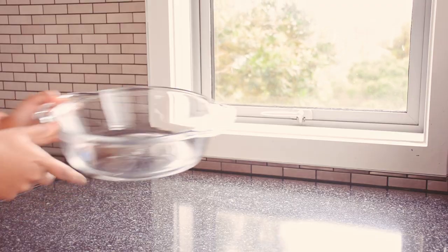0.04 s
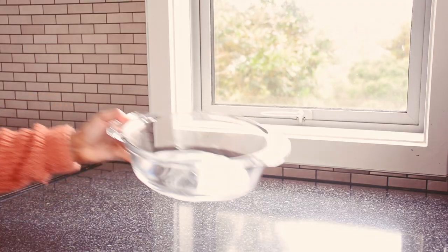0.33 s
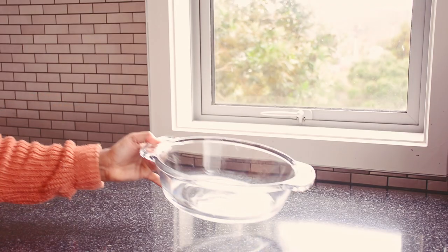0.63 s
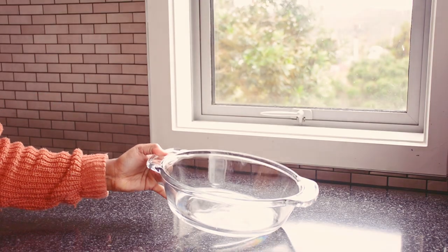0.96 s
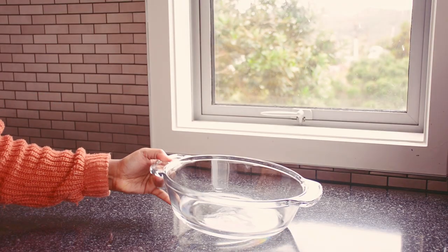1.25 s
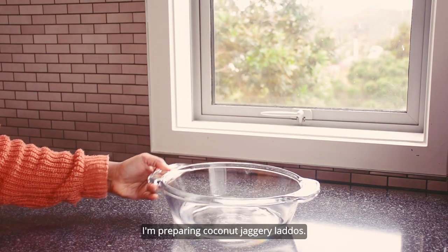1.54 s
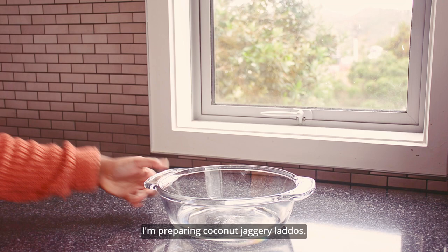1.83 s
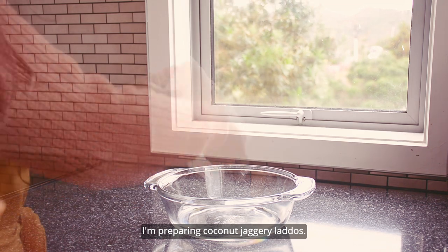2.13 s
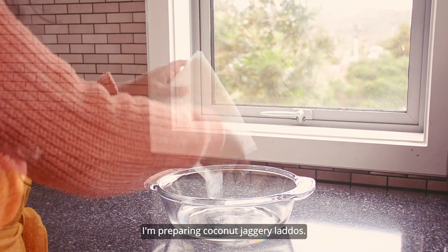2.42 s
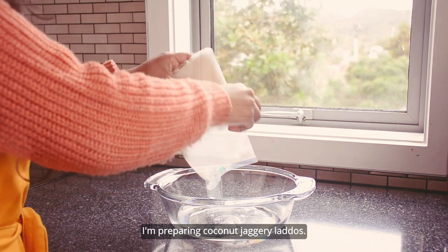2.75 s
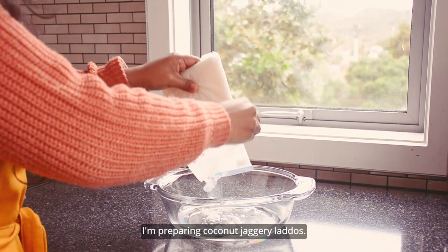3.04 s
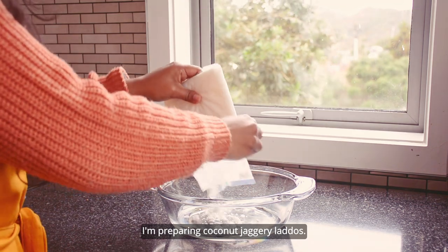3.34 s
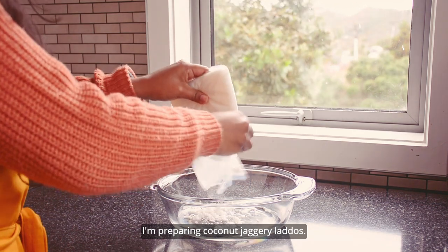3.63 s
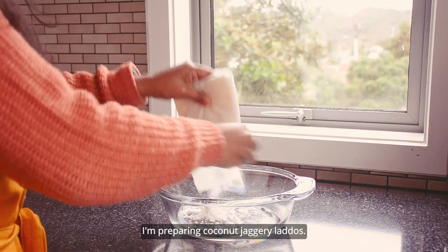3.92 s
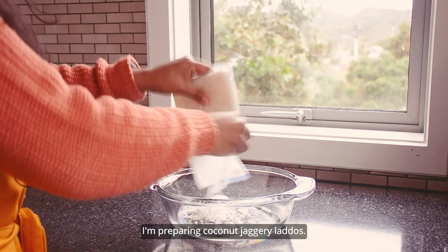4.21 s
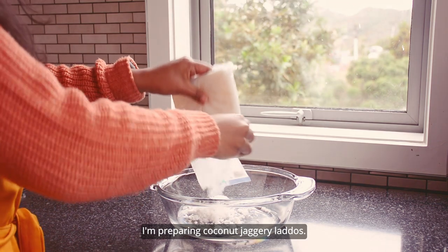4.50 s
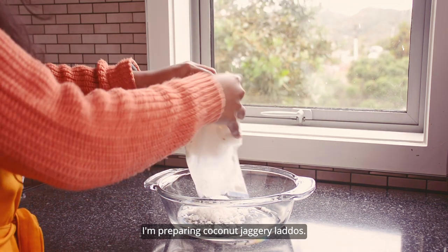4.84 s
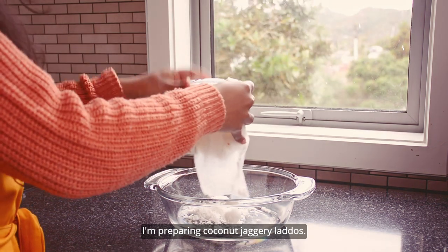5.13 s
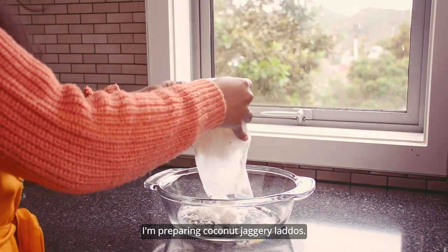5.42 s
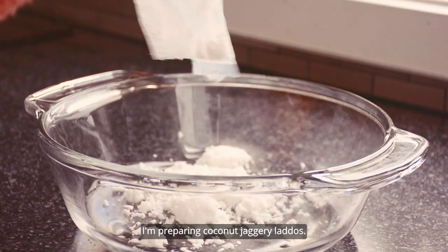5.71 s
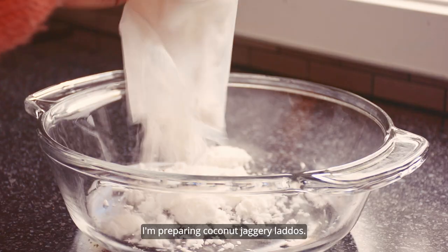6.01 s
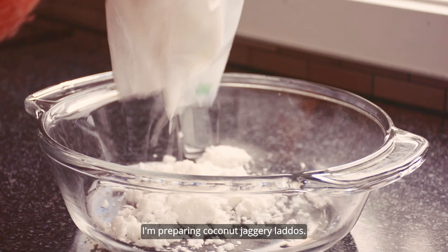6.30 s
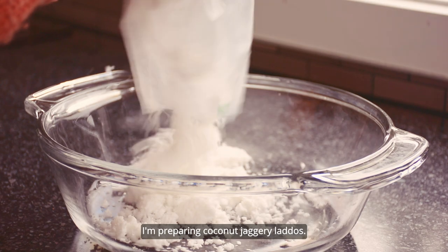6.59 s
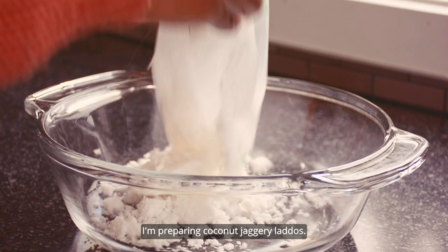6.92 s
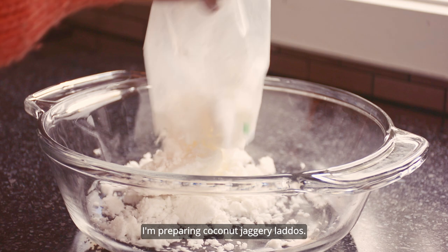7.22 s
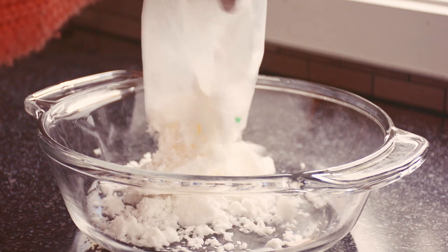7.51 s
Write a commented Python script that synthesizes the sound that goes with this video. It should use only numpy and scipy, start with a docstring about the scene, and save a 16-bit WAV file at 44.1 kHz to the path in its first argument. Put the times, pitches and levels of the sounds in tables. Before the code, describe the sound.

A double knock is followed by the hard thud of a glass bowl on a stone kitchen counter. The bowl settles with several quick knocks and a fading ring. Then come two quieter spells of plastic crinkling, with a lull between, as a bag is shaken and squeezed empty and coconut flakes patter softly into the glass. The small, still room echoes briefly, and the loudest blows just overload the microphone.

```python
"""Grated coconut into a glass bowl

In a tiled kitchen something knocks, then a glass bowl lands on a stone counter, rocks flat and rings.
A thin plastic bag of grated coconut is shaken and squeezed over it: the film buckles in sharp crinkles,
the flakes rustle down into the bowl, and the room echoes the knocks, crinkles and rustle."""
import sys
import numpy as np
from scipy import signal
from scipy.fft import rfft, irfft
from scipy.io import wavfile
from scipy.ndimage import uniform_filter1d

SR = 44100
rng = np.random.default_rng(int(sys.argv[2]) if len(sys.argv) > 2 else 0)


def to_wav(s):
    """Save 16-bit WAV."""
    ch = np.atleast_2d(s).T  # columns
    pcm = np.round(np.clip(ch, -1, 1) * 32767)  # PCM
    wavfile.write(sys.argv[1], SR, pcm.astype(np.int16))


N = 332955
TIME = np.arange(N) / SR

# Levels in dB are relative. A ring time is how long a sound takes to fade by 60 dB.
# Tone colours. Each row: frequency in Hz, level in dB.
AIR_COLOUR = [(15, -43), (25, -17.5), (114, -4.5), (137, -7.5), (157, -18), (200, -10), (531, -19.5),
              (659, -17), (796, -22), (16000, -32)]  # the quiet room
THUD_COLOUR = [(35, -47), (100, -19.5), (170, -19), (255, -5), (450, 0), (850, -1.5), (1100, -6),
               (1900, -12), (3000, -22), (5500, -35), (9000, -41), (16000, -57)]  # a blow on the counter
FILM_COLOUR = [(400, -20), (950, -2.5), (1400, 2), (2700, 3.5), (5000, -3.5), (7000, -34.5), (12000, -44.5)]  # ringing plastic
SNAP_COLOUR = [(2000, -44.5), (5200, 5.5), (8000, 7.5), (10000, 1), (13000, -2.5), (16000, -10)]  # snapping plastic
BAG_COLOUR = [(40, -24), (110, -9.5), (160, -8), (280, -3), (500, 1.5), (800, 3), (1300, -7.5),
              (5000, -78.5)]  # a jolt of the whole bag
FLAKE_COLOUR = [(50, -30), (110, -3), (180, -4), (310, 6), (550, 6), (950, 3.5), (1400, 2.5), (2400, -3),
                (4500, -9.5), (8000, -22), (16000, -40.5)]  # falling coconut
# Blows on the counter. Each row: start in seconds, level in dB, brightness in dB per octave,
# the counter's share of hollow ringing in dB, level of the glass ping in dB.
BLOWS = [(0.1251, -30.5, 1.5, 3, -90), (0.195, -29.5, 5, 8, -90), (0.217, -7.5, -1.6, -22, -90),
         (.232, -11.5, 4, -24, -87), (0.787, -50, 6, -13, -60.5), (1.0274, 0, -2, 1, -53),
         (1.04, -2.5, -8.5, 4, -35.5), (1.469, -34.5, -17, -12, -90), (1.545, -32, -3.5, 7.5, -81),
         (1.5922, -20.5, -3, 6, -71), (1.6522, -14, 0, 12.5, -66), (1.675, -6, -3.5, 9, -40),
         (1.6964, 3, -4.5, -23, -40.5), (1.714, -10.5, -3, 9.5, -52)]
# Tones that struck things ring with. Each row: pitch in Hz, level in dB, ring time in seconds.
COUNTER_TONES = [(251.2, 12.5, 0.12), (282.2, 3, 0.26), (384.6, -3.5, 0.3), (474, -8, 0.26),
                 (538, -15, 0.77), (565, -16, 0.45), (597, 9, 0.31), (832, 6, 0.16), (840, -6, 0.124),
                 (1108, -18, 0.42), (1285, -4.5, 0.2)]
GLASS_TONES = [(690, 11, 0.48), (1660, 7, 0.24), (2300, -11, .2), (3857, -0.5, 0.36), (4030, -6, 0.64),
               (4500, -11, 0.31), (5710, -7, .4), (5670, -1, 0.28)]
# Cabinet shudders, and the own tone of the first knocked thing. Each row: start in seconds, pitch in Hz, level
# in dB, ring time in seconds.
SHUDDERS = [(.218, 43.6, -35, 0.86), (0.219, 413, -8.5, 0.14), (1.027, 101, -41.5, .35),
            (1.68, 52.6, -33, .3)]
# The free bowl's lowest tone, split into two close pitches.
# In order: start in seconds, pitch in Hz, gap between the two in Hz, level in dB, ring time in seconds.
BOWL_HUM = (1.71, 679, 1.4, -3, .75)
# Its next tone, no longer damped by the hand. In order: pitch in Hz, level in dB, ring time in seconds.
BOWL_OVERTONE = (1600, -22, 0.32)
# Sliding touches. Each row: middle and half length in seconds, level in dB, low and high edge in Hz.
SLIDES = [(1.95, 0.02, -51.5, 2500, 7060), (2.68, .055, -47, 3470, 9300)]
# Sharp buckles of the bag. Each row: time in seconds, pitch in Hz, ring level in dB, snap level in dB.
SHARP_BUCKLES = [(2.131, 2150, -41.5, -78), (2.2886, 2340, -22, -34.5), (2.3854, 1080, -29.5, -39),
                 (2.6288, 2740, -30, -32.5), (2.7297, 4130, -36.5, -30.5), (2.958, 4200, -27.5, -40.5),
                 (3.1087, 4000, -20.5, -25.5), (3.406, 2300, -26.5, -32), (3.4382, 1310, -23.5, -42),
                 (3.5478, 3200, -22, -28), (3.6346, 1550, -15, -24), (3.7534, 3250, -18, -28),
                 (3.8491, 2250, -17.5, -25.5), (3.9467, 2170, -20.5, -28.5), (4.011, 2690, -21.5, -32),
                 (4.0738, 2320, -19, -30.5), (4.2358, 2200, -24, -26.5), (4.2833, 2080, -21, -30),
                 (4.393, 2500, -20, -23), (4.4911, 3940, -27.5, -40), (4.593, 1650, -35, -44),
                 (4.6419, 1630, -34.5, -42), (4.761, 2130, -38, -50), (5.026, 2540, -28, -45),
                 (5.3445, 5030, -41, -42), (5.4383, 2200, -30.5, -47), (5.674, 1940, -25.5, -47),
                 (5.7727, 1910, -22.5, -33), (5.8438, 2160, -20.5, -23), (5.9139, 2780, -21.5, -29),
                 (5.9384, 2240, -19.5, -25.5), (5.9827, 1880, -20, -27), (6.0284, 2150, -21, -27.5),
                 (6.1918, 2220, -24, -38), (6.2354, 1520, -21.5, -38), (6.2624, 1420, -13.5, -28.5),
                 (6.2791, 2170, -19.5, -23), (6.3822, 2220, -23.5, -35.5), (6.4359, 1760, -20.5, -31.5),
                 (6.5029, 1380, -21.5, -32), (6.526, 2190, -18.5, -29), (6.5504, 1430, -15, -27.5),
                 (6.656, 2620, -23, -35), (6.6941, 2150, -26, -40), (6.7346, 2480, -18.5, -24),
                 (6.7893, 1360, -23, -35), (6.911, 2260, -23.5, -42), (6.991, 3100, -19, -34),
                 (7.0085, 1920, -17.5, -26), (7.1714, 2040, -20, -34), (7.191, 4300, -22, -18.5),
                 (7.3676, 4660, -20, -21.5), (7.4189, 1880, -15, -34), (7.486, 2530, -20.5, -20)]
# Shakes of the bag. Each row: time in seconds, thump level in dB.
BAG_SHAKES = [(2.386, -39.5), (2.473, -42), (3.15, -31.5), (3.295, -21.5), (3.394, -28.5), (3.442, -32.5),
              (3.53, -23), (3.612, -25), (3.757, -23), (3.85, -30), (3.96, -22.5), (4.074, -23),
              (4.227, -25), (4.388, -31), (4.286, -34.5), (4.475, -30), (4.667, -39), (4.87, -43.5),
              (5.244, -48), (5.312, -42.5), (5.477, -39), (5.69, -41), (6.252, -30), (6.439, -33),
              (6.552, -27.5), (6.656, -31.5), (6.764, -31.5), (7.084, -29), (7.134, -27.5), (7.275, -26.5),
              (7.341, -28), (7.486, -24.5)]
# Flow of flakes as the bag is tipped, then squeezed empty. Each row: time in seconds, level in dB.
TIP_FLOW = [(2.56, -37.5), (2.98, -49), (3.19, -43), (3.32, -34), (3.44, -33), (4.18, -31.5),
            (4.28, -30.5), (4.65, -45.5), (5.08, -49), (5.24, -49.5), (5.6, -51)]
SQUEEZE_FLOW = [(5.64, -58), (5.708, -42.5), (5.862, -30), (6.092, -37.5), (6.256, -42), (6.394, -32.5),
                (6.608, -36.5), (6.788, -32), (7.032, -37), (7.198, -36.5), (7.55, -34)]
# The kitchen's echo. Each row: frequency in Hz, ring time in seconds before room() scales it.
ECHO_TIMES = [(100, 0.57), (400, 0.43), (1200, 0.4), (3500, 0.39), (7000, 0.56), (14000, 0.19)]


def gain(db):
    """Turn decibels into a number to multiply by."""
    return 10 ** (np.asarray(db) / 20)


def unit(x):
    """Scale a sound to an energy of one."""
    return x / np.sqrt(np.sum(x ** 2) + 1e-18)


def curve(points, hz):
    """Read between rows of (Hz, value), giving every octave equal space."""
    frequencies, values = np.transpose(points)
    return np.interp(np.log(hz + 1), np.log(frequencies), values)


def click(db_at, size=2048):
    """A click of energy one whose tone colour is db_at(frequency)."""
    cepstrum = irfft(np.log(gain(db_at(np.fft.rfftfreq(size, 1 / SR)))))
    # Folding the late half onto the early half packs the energy at the start.
    cepstrum[1:size // 2] *= 2
    cepstrum[size // 2 + 1:] = 0
    return unit(irfft(np.exp(rfft(cepstrum))))


def colour(x, points):
    """Give a sound a tone colour and an average power of one."""
    return unit(signal.fftconvolve(x, click(lambda f: curve(points, f)))[:N]) * np.sqrt(N)


def add(out, start_s, x):
    """Mix x into out from start_s on."""
    i = int(start_s * SR)
    out[i:i + len(x)] += x[:N - i]


def ring(tones, detune):
    """One second of fading tones, each off its pitch by its fraction in detune."""
    t = TIME[:SR]
    return sum(gain(db - 60 * t / ring_s) * np.sin(2 * np.pi * hz * (1 + off) * t)
               for (hz, db, ring_s), off in zip(tones, detune))


def grains(per_s, scatter_db, size):
    """Tiny random impacts, mostly faint with a few strong ones."""
    force = gain(scatter_db * np.minimum(rng.exponential(size=size), 3.5))
    return (rng.random(size) < per_s / SR) * force * rng.choice([-1, 1], size)


def flicker(per_s):
    """A smooth random wander, roughly one either side of zero."""
    hold = int(SR / per_s)
    steps = np.repeat(rng.standard_normal(N // hold + 1), hold)
    return 1.2 * uniform_filter1d(steps, hold)[:N]


def room(time_scale=0.63, gap_s=0.0024, build_s=0.00033, size=32768):
    """Dense echoes off the tiles set in quickly; the highest treble dies first."""
    t, f = TIME[:size], np.fft.rfftfreq(size, 1 / SR)
    centres, ring_times = np.transpose(ECHO_TIMES)
    noise = rfft(rng.standard_normal(size))
    tail = 0
    for ring_s, this_band in zip(ring_times * time_scale, np.eye(len(centres))):
        band = np.interp(np.log(f + 1), np.log(centres), this_band)
        tail = tail + irfft(noise * band) * gain(-60 * t / ring_s)
    return unit(tail * (1 - np.exp(-np.maximum(t - gap_s, 0) / build_s)))


def in_room(x, echo_db, time_scale=0.29):
    """A sound plus the echo of its own spot in the kitchen."""
    return x + gain(echo_db) * signal.fftconvolve(x, room(time_scale))[:N]


def air(db=-52.5):
    """The still kitchen: a faint, low, steady noise."""
    return gain(db) * colour(rng.standard_normal(N), AIR_COLOUR)


def knocks(boost_db=22, chatter=2.1, chatter_s=0.0082, counter_db=-3.5, detune=0.0052, rise_s=0.0034):
    """Each blow is a push with a brief chatter; it thuds and sets the counter ringing."""
    thuds, slab, t = np.zeros(N), np.zeros(N), TIME[:SR]
    for s, db, bright_db, hollow_db, _ in BLOWS:
        contact = chatter * unit(rng.standard_normal(SR) * np.exp(-t / chatter_s))
        contact[0] += 1  # the push
        thud = click(lambda f: curve(THUD_COLOUR, f) + bright_db * np.log2(np.clip(f, 200, 3000) / 600))
        add(thuds, s, gain(db + boost_db) * unit(signal.fftconvolve(contact, thud)))
        tones = ring(COUNTER_TONES, detune * rng.standard_normal(len(COUNTER_TONES)))
        tones *= 1 - np.exp(-t / rise_s)  # the slab takes a moment to get moving
        add(slab, s, gain(db + boost_db + counter_db + hollow_db) * unit(tones))
    return in_room(thuds, echo_db=-2.5, time_scale=0.98) + in_room(slab, echo_db=-8, time_scale=0.32)


def shudders(rise_s=0.0049):
    """Heavy blows make the cabinet under the counter shudder, and the first knocked thing rings with a tone of
    its own."""
    out = np.zeros(N)
    for s, *tone in SHUDDERS:
        add(out, s, ring([tone], detune=[0]) * (1 - np.exp(-TIME[:SR] / rise_s)))
    return out


def bowl(detune=0.00184, softness=0.21, hard_blow_db=-7):
    """The glass pings when struck and hums on with a slow throb once it stands free."""
    out, t = np.zeros(N), TIME[:SR]
    for s, blow_db, _, _, ping_db in BLOWS:
        tilt = softness * (blow_db - hard_blow_db)  # dB per octave: a gentle touch misses high tones
        tones = [(hz, db + tilt * np.log2(hz / GLASS_TONES[0][0]), ring_s)
                 for hz, db, ring_s in GLASS_TONES]
        add(out, s, gain(ping_db) * ring(tones, detune * rng.standard_normal(len(tones))))
    free_s, hz, split_hz, db, ring_s = BOWL_HUM
    throb = np.sin(np.pi * split_hz * t)
    add(out, free_s, throb * ring([(hz, db, ring_s)], detune=[0]))
    add(out, free_s, ring([BOWL_OVERTONE], detune=[0]))
    return out


def swishes():
    """Two soft hisses: fingers brush the glass as they let go, and later the film slides on itself."""
    out = np.zeros(N)
    for s, width_s, db, low_hz, high_hz in SLIDES:
        band = signal.butter(2, [low_hz, high_hz], "bandpass", fs=SR, output="sos")
        hiss = signal.sosfilt(band, rng.standard_normal(N))
        swell = np.exp(-.5 * ((TIME - s) / width_s) ** 2)
        out += gain(db) * swell * hiss / np.std(hiss)
    return out


def flow(s):
    """Level in dB of the steady flow out of the bag at s seconds."""
    return np.interp(s, *np.transpose(TIP_FLOW + SQUEEZE_FLOW), left=-120)


def creases(ring_db=3, snap_db=-11, spread_db=3, middle_hz=2000, spread_octaves=0.48, count=60):
    """Small random buckles that follow the flow's strength, in rows like SHARP_BUCKLES."""
    start, end = TIP_FLOW[0][0], SQUEEZE_FLOW[-1][0]
    times = start + (end - start) * (np.arange(count) + rng.random(count)) / count
    pitch, force, crisp = np.clip(rng.standard_normal((count, 3)), -2, 2).T
    hz = middle_hz * 2 ** (spread_octaves * pitch)
    db = flow(times) + ring_db + spread_db * force
    return list(zip(times, hz, db, db + snap_db + spread_db * crisp))


def buckles(quick_ms=4.57, shake_ms=22, shake_hz=1500):
    """Quick buckles and slow shakes. Each row: seconds, length in ms, Hz, ring, snap and thump in dB."""
    quick = [(s, quick_ms, hz, db, snap_db, db - 7)
             for s, hz, db, snap_db in list(SHARP_BUCKLES) + creases()]
    slow = [(s, shake_ms, shake_hz, db - 2.5, db - 16, db) for s, db in BAG_SHAKES]
    return quick + slow


def folds(uneven_db=2.6, count=46):
    """The random, uneven tone colour of one crumpled patch of film."""
    bumps_db = uneven_db * np.clip(rng.standard_normal(count), -2, 2)
    return np.column_stack([np.geomspace(200, 7000, count), bumps_db])


def crinkles(peak_db=9, peak_width=0.21, grit=0.58, spread=0.31, size=2048, spot_count=7):
    """A buckle is a burst of tiny slips; they ring a patch of film, snap and jolt the bag."""
    direct, spots = np.zeros(N), np.zeros((spot_count, N))
    offset = np.arange(size) - size // 2
    snap = click(lambda f: curve(SNAP_COLOUR, f))
    for k, (s, ms, hz, ring_db, snap_db, thump_db) in enumerate(buckles()):
        length = ms * SR / 1000
        swell = np.exp(-.5 * (offset / (spread * length)) ** 2)
        # Single slips stand out of the fine tearing of the crease.
        slips = unit(swell * grains(per_s=2200, scatter_db=4.5, size=size))
        slips += grit * unit(swell * rng.standard_normal(size))
        patch = folds()
        film = click(lambda f: curve(FILM_COLOUR, f) + curve(patch, f)
                     + peak_db / (1 + ((f / hz - 1) / peak_width) ** 2))
        thump = click(lambda f: curve(BAG_COLOUR, f) + curve(patch, f))
        parts = [(film, ring_db - 1, -3), (snap, snap_db - 2, -3), (thump, thump_db - 3, -2)]
        for shape, db, echo_db in parts:
            strength = gain(db) * np.sqrt(length)
            add(direct, s + offset[0] / SR, strength * unit(signal.fftconvolve(slips, shape)))
            # The walls get the slips from every side, so the echo keeps only their tone colour.
            add(spots[k % spot_count], s, strength * gain(echo_db) * shape)
    # Each spot on the moving bag has its own echo.
    return direct + sum(signal.fftconvolve(spot, room())[:N] for spot in spots)


def pouring(spill_db=-44, spill_s=0.017):
    """Level in dB of the steady flow plus the tiny spill of flakes after each shake."""
    power = gain(flow(TIME)) ** 2
    fade = np.exp(-TIME[:SR] / spill_s)
    spill = (1 - fade) * fade
    for s, db in BAG_SHAKES:
        add(power, s, (gain(db + spill_db) * spill) ** 2)
    return 10 * np.log10(power)


def rustle(flakes_db=-5, hiss_db=-19, hiss_growth=2.7, brisk_db=-30, clump_db=2, band_db=4.0, bands=7):
    """Flakes slide along the film and land in soft clumps; a brisk flow hisses more."""
    flow_db = pouring()
    patter = grains(per_s=5000, scatter_db=3.5, size=N)
    flakes = colour(patter, FLAKE_COLOUR)
    clumps = clump_db * flicker(per_s=120)
    edges_hz = np.geomspace(70, 12000, bands + 1)
    body = 0
    for band in zip(edges_hz, edges_hz[1:]):  # bands flicker apart, so each clump has its own colour
        part = signal.sosfiltfilt(signal.butter(2, band, "bandpass", fs=SR, output="sos"), flakes)
        body = body + part * gain(clumps + band_db * flicker(per_s=110))
    hiss_level_db = brisk_db + hiss_growth * (flow_db - brisk_db) + hiss_db + clumps
    hiss = gain(hiss_level_db) * colour(patter, SNAP_COLOUR)
    return gain(flow_db + flakes_db) * body / np.std(body) + hiss


def scene():
    """Counter, bowl, bag and flakes over the still air of the kitchen, in one channel."""
    mix = air() + knocks() + shudders() + bowl() + crinkles() + in_room(rustle() + swishes(), echo_db=-2)
    return mix[None]


def record(dry):
    """The hardest blows overload the microphone; sound below 20 Hz and above 15800 Hz is cut."""
    bass_cut = signal.butter(1, 20, "highpass", fs=SR, output="sos")
    treble_cut = signal.ellip(10, .1, 80, 15800, fs=SR, output="sos")
    overloaded = np.clip(dry, -1, 1)
    return signal.sosfilt(treble_cut, signal.sosfilt(bass_cut, overloaded))


dry = scene()
out = record(dry)
to_wav(out)
```